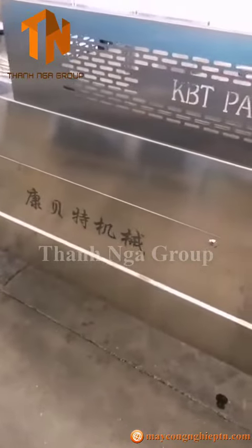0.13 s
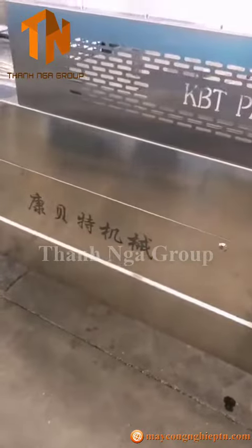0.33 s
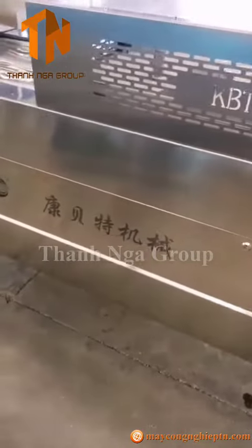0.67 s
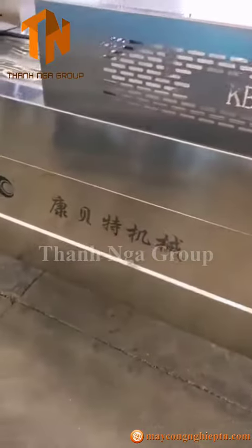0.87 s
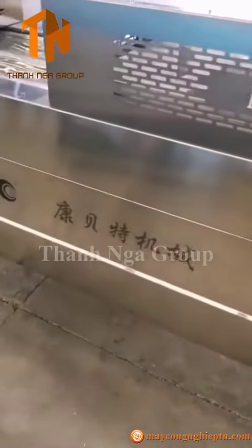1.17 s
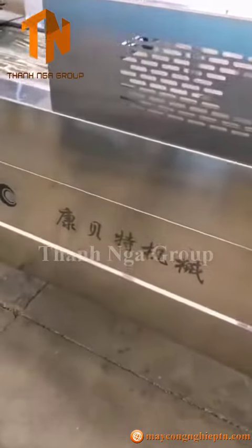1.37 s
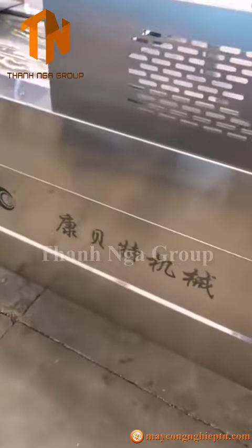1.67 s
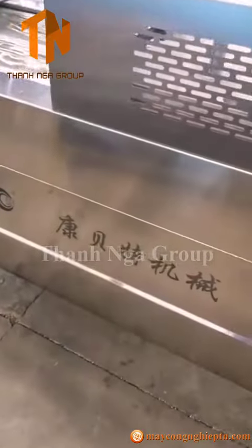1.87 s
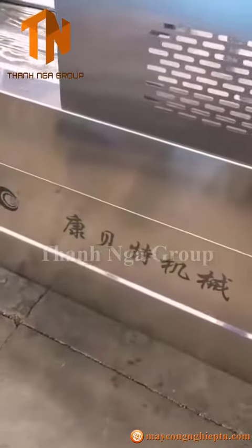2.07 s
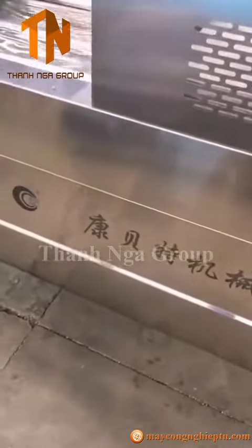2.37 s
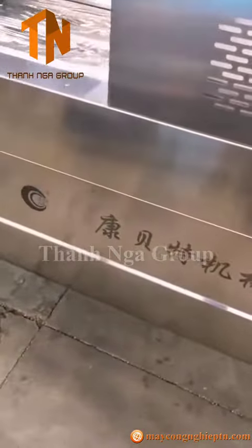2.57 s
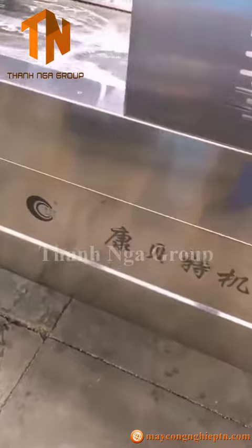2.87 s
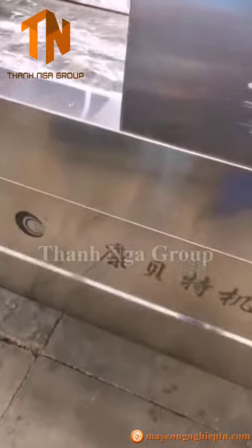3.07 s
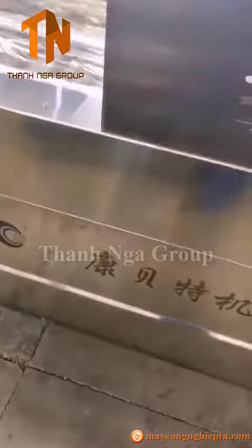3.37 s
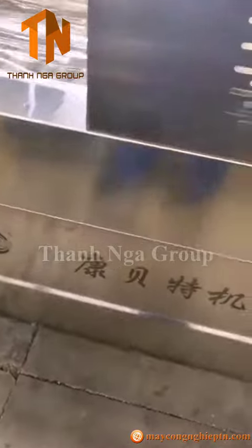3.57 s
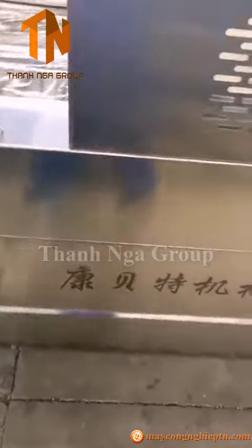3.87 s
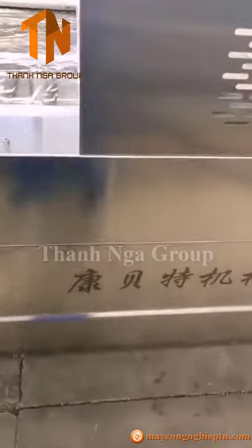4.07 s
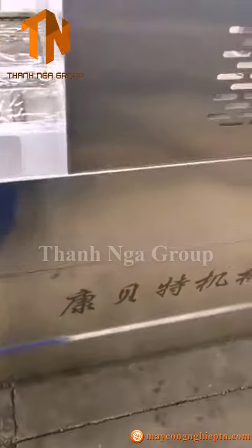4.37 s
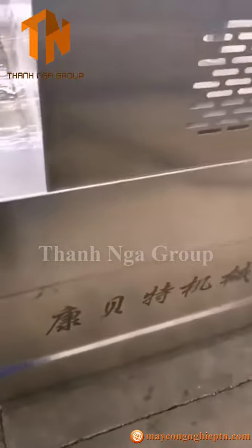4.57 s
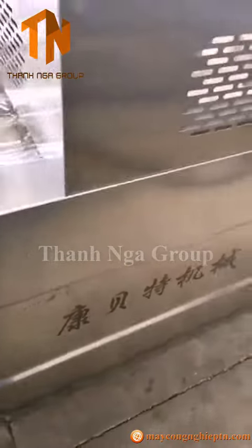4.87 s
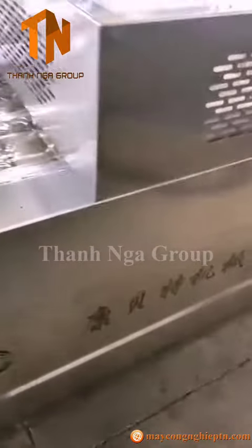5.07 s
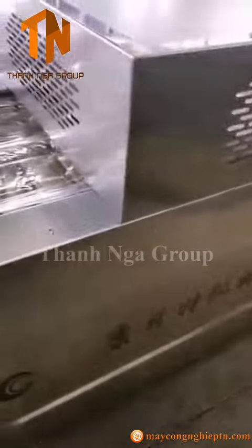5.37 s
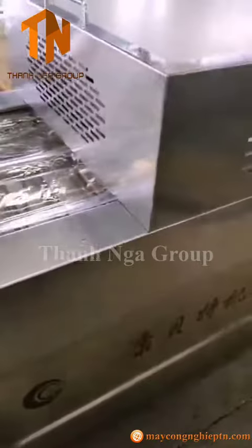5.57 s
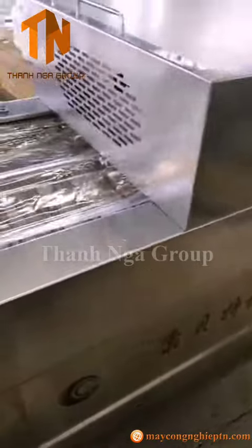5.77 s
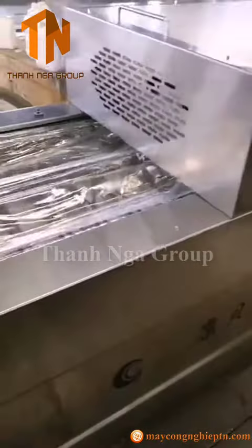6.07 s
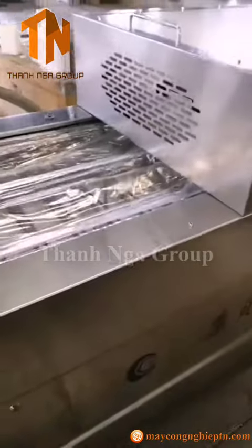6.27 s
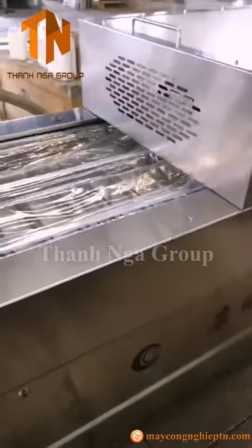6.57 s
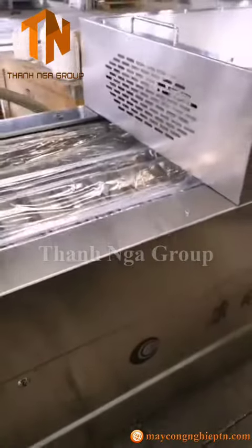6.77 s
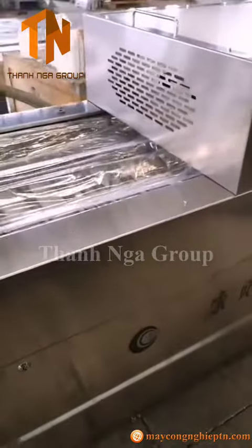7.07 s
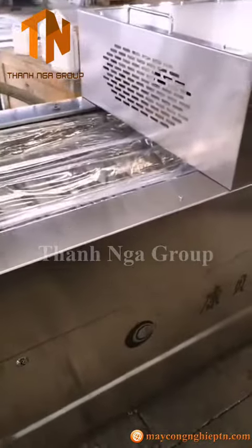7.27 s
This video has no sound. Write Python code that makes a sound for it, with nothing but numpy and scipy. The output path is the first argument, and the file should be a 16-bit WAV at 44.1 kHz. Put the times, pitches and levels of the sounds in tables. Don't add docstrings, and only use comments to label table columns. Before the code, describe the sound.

Close mono pickup beside a steel machine in a hard-surfaced hall: a forceful, bright air release comes first, weakening before it stops with a dull thump. Several seconds of low drive rumble and thin hiss carry small frame knocks, tiny dry roller squeaks and a far air leak. Then a longer, steadier and brighter jet bursts out, ending in chattering puffs, heavy clanks, a faint motor hum and one final puff.

```python
import sys
import numpy as np
from scipy import signal
from scipy.fft import rfft, irfft, next_fast_len
from scipy.io import wavfile
from scipy.ndimage import uniform_filter1d

SR = 44100
rng = np.random.default_rng(int(sys.argv[2]) if len(sys.argv) > 2 else 0)


def to_wav(sig):
    pcm = np.clip(np.atleast_2d(sig), -1, 1) * 32767
    pcm = np.round(pcm).astype(np.int16)
    wavfile.write(sys.argv[1], SR, pcm.T)


def to_linear_factor(level_db):
    exponent = np.asarray(level_db, float) / 20
    return 10 ** exponent


N = 326781

# time_s, level_db
FIRST_VENT = [
    (0.065, -69),
    (0.089, -46),
    (0.103, -21),
    (0.128, -21),
    (0.45, -22),
    (0.81, -24.5),
    (0.95, -28.5),
    (1.03, -31),
    (1.212, -31),
]
# time_s, pitch_hz, level_db
MOTOR = [(6.4, 78, -45.5), (6.5, 81.8, -53), (6.722, 82, -58), (6.792, 69, -41), (6.854, 69, -57),
         (6.934, 73.5, -47), (7.19, 72.7, -61), (7.252, 75.5, -51), (7.41, 74.5, -52)]


def rms_one(x):
    return x / np.sqrt(np.mean(x ** 2) + 1e-20)


def in_time(rows):
    s, *columns = np.transpose(rows)
    return [np.interp(np.arange(N) / SR, s, c) for c in columns]


def sounding(rows, fade_s=0.036):
    start_s, end_s = rows[0][0], rows[-1][0]
    corners_s = [start_s - fade_s, start_s, end_s, end_s + fade_s]
    return np.interp(np.arange(N) / SR, corners_s, [0, 1, 1, 0])


def swells(rows, rise_s, fall_db_per_s):
    t = np.arange(N) / SR
    total = np.zeros(N)
    for start_s, hold_s, level_db in rows:
        rise = np.clip((t - start_s) / max(rise_s, .001), 0, 1) ** 2
        fall_db = fall_db_per_s * np.maximum(t - start_s - hold_s, 0)
        total += rise * to_linear_factor(level_db - fall_db)
    return total


def drift(rate):
    r = np.exp(-80 * np.pi * rate / SR)
    slow = signal.lfilter([1], [1, -2 * r, r * r], rng.standard_normal(N // 40 + 2002))[2000:]
    return np.interp(np.arange(N) / 40, np.arange(len(slow)), rms_one(slow))


def band(x, low_hz, high_hz):
    return signal.sosfilt(signal.butter(2, [low_hz, high_hz], "band", fs=SR, output="sos"), x)


def turbulence(together_db, patchy_db, patch_rate):
    white = rng.standard_normal((2, N))
    gust_db = together_db * drift(19.0)
    edges = 20 * 2 ** np.arange(0, 9.9, 1 / 3)
    total = np.zeros(N)
    for k, (low_hz, high_hz) in enumerate(zip(edges, edges[1:])):
        flicker_db = gust_db + patchy_db * drift(patch_rate)
        total += to_linear_factor(flicker_db) * band(white[k % 2], low_hz, high_hz)
    return total


def colour(x, spectrum, resonances):
    size = next_fast_len(N)
    hz = np.arange(size // 2 + 1) * SR / size + 1e-3
    spectrum_hz, spectrum_db = np.transpose(spectrum)
    gain_db = np.interp(np.log(hz), np.log(spectrum_hz), spectrum_db)
    for centre_hz, width_hz, lift_db in resonances:
        gain_db += lift_db / (1 + (2 * (hz - centre_hz) / width_hz) ** 2)
    return hz, rfft(x, size) * to_linear_factor(gain_db)


def registers(hz, shaped, low_hz, high_hz):
    low = 1 / (1 + (hz / low_hz) ** 6)
    high = 1 / (1 + (high_hz / hz) ** 10)
    parts = (low, 1 - low - high, high)
    return [rms_one(irfft(shaped * part, next_fast_len(N))[:N]) for part in parts]


def tone(hz, gain, waver_db, waver_hz, rate):
    phase = 2 * np.pi * np.cumsum(hz + waver_hz * drift(rate)) / SR
    return np.sqrt(2) * gain * to_linear_factor(waver_db * drift(rate)) * np.sin(phase)


def far_hose():
    # start_s, length_s, level_db
    hose_leaks = [
        (2.62, 0.16, -57),
        (2.9, 0.55, -57.5),
    ]
    return swells(hose_leaks, rise_s=0.075, fall_db_per_s=25)


def machine(first, second):
    # time_s, level_db
    drive_level = [(0.07, -52), (0.16, -46.5), (0.5, -59.5), (1.03, -62), (1.3, -55.5), (1.55, -59.5),
                   (1.81, -54), (2.15, -56), (2.62, -51.5), (2.89, -48.5), (3.32, -47), (3.88, -48.5),
                   (4.15, -49), (4.6, -53), (5.6, -55), (6.3, -51), (6.87, -48), (7.41, -49.5)]
    # frequency_hz, density_db
    machine_spectrum = [(15, -45), (25, -10.5), (293, -1.5), (363, -5.5), (649, -16), (802, -14),
                        (1330, -17), (1600, -15.5), (1970, -18.5), (2940, -16.5), (4480, -21),
                        (5690, -15.5), (6330, -22.5), (14000, -26.5)]
    # centre_hz, width_hz, lift_db
    housing_modes = [(267, 90, -3), (2868, 430, 3), (5480, 1200, -2.5)]
    drive_db = in_time(drive_level)[0]
    swing_db = drive_db + 52
    rumble_gain, rattle_gain = to_linear_factor(-60 + 1.2 * swing_db), to_linear_factor(-51.5 + 0.6 * swing_db)
    hiss_gain, top_gain = to_linear_factor(-45 + 0.36 * swing_db), to_linear_factor(-58 + 0.068 * swing_db)

    pump_idle_db = -5.5
    hiss_gain = hiss_gain * to_linear_factor(pump_idle_db * (np.arange(N) < FIRST_VENT[2][0] * SR))
    motor_rumble_db = 3.5
    rumble_gain = rumble_gain * to_linear_factor(motor_rumble_db * sounding(MOTOR, fade_s=0.23))
    jet_rumble_db, jet_shake_db = -40, -28.5
    rumble_gain = np.hypot(rumble_gain, to_linear_factor(jet_rumble_db) * (first + second))
    rattle_gain = np.hypot(rattle_gain, to_linear_factor(jet_shake_db) * second)
    top_gain = np.hypot(top_gain, far_hose())

    noise = turbulence(together_db=0.5, patchy_db=1.9, patch_rate=14.)
    rumble, drive, upper = registers(*colour(noise, machine_spectrum, housing_modes), 170, 500)
    flat = [(1, 0), (2, 0)]
    rattle, hiss, top = registers(*colour(upper, flat, []), 1400, 8300)
    below = rumble_gain * rumble + to_linear_factor(drive_db) * drive + rattle_gain * rattle
    return below + hiss_gain * hiss + top_gain * top


def flow(rows, close_db_per_s):
    start_s, open_s = rows[0][0], rows[-1][0] - rows[0][0]
    hall_db, hall_fall_db_per_s = -11, 77
    direct = swells([(start_s, open_s, 0)], 0, close_db_per_s)
    hall = swells([(start_s, open_s, hall_db)], 0, hall_fall_db_per_s)
    return to_linear_factor(in_time(rows)[0]) * np.maximum(direct, hall)


def reflected(x):
    # extra_path_m, level_db, change_m_per_s
    echo_paths = [(0.6, -17, 0.07), (1.3, -17, -0.11), (2.7, -19, 0.15), (5.3, -19, -0.2)]
    n = np.arange(N)
    total, power = x.copy(), 1
    for path_m, level_db, speed in echo_paths:
        delay = (path_m + speed * n / SR) * SR / 343  # samples, at 343 m/s
        total += to_linear_factor(level_db) * np.interp(n - delay, n, x, left=0)
        power += to_linear_factor(2 * level_db)
    return total / np.sqrt(power)


def vent(air, gain, spectrum, nozzle, throat_db, top_db):
    throat, body, top = registers(*colour(air, spectrum, nozzle), 1950, 9000)
    throat_lag_s = 0.012
    keep = np.exp(-1 / (throat_lag_s * SR))
    late = signal.lfilter([1 - keep], [1, -keep], gain + 1e-12)
    sharp = gain * np.minimum(gain / to_linear_factor(-42), 1)
    return gain * body + to_linear_factor(throat_db) * late * throat + to_linear_factor(top_db) * sharp * top


def first_jet(eddies, gain):
    # frequency_hz, density_db
    first_spectrum = [(290, -42.5), (500, -32.5), (923, -28.5), (1270, -25.5), (2780, -1), (5740, -4.5),
                      (6780, -7), (7790, 1), (9210, -6), (14000, -1.5)]
    # centre_hz, width_hz, lift_db
    first_modes = [(2720, 190, 1), (5760, 1700, 10), (7950, 1000, 6.)]
    return vent(eddies, gain, first_spectrum, first_modes, throat_db=-13.0, top_db=-3.0)


def struck_frame(table, low, high, push_share):
    out, t = np.zeros(N), np.arange(SR // 2) / SR
    rise = 1 - np.exp(-t / 0.0083)
    for (start_s, peak_db, centre_hz, t60_s), noise in zip(table, rng.standard_normal((len(table), len(t)))):
        edges = centre_hz * low, centre_hz * high
        shake = rms_one(band(band(noise, *edges), *edges))
        push = np.sin(2 * np.pi * centre_hz * t) * to_linear_factor(-60 * t / (t60_s * 0.77))
        blow = rise * (0.57 * shake * to_linear_factor(-60 * t / t60_s) + push_share * push)
        at = round(start_s * SR)
        out[at:at + len(t)] += to_linear_factor(peak_db) * blow[:N - at]
    return out


def lid_blows():
    # start_s, peak_db, centre_hz, t60_s
    scrape_blows = [
        (0.105, -29.5, 808, 0.97),
        (1.604, -41, 975, 0.56),
        (1.648, -45, 960, 0.2),
        (1.699, -36, 950, 0.28),
        (7.251, -23, 964, 0.087),
    ]
    # start_s, peak_db, centre_hz, t60_s
    thump_blows = [(1.202, -27.5, 117.5, 0.27), (1.225, -30, 264.5, 0.27), (1.299, -36.5, 264, 0.18),
                   (1.645, -35, 346, 0.3), (1.699, -36.5, 256, 0.24), (1.769, -42.5, 252, 0.31),
                   (1.869, -43, 245, 0.22), (2.654, -41, 305, 0.52), (2.905, -35, 293, 0.7),
                   (3.029, -31, 256, 0.12), (3.149, -33.5, 247, 0.19), (3.245, -35, 175.6, 0.4),
                   (3.778, -39, 276, 0.31), (4.049, -37, 218, 0.25), (4.399, -31, 338, 0.081),
                   (6.389, -29, 97, 0.14), (6.437, -34, 87, 0.3), (6.643, -36, 100, 0.26),
                   (6.701, -23.5, 201.4, 0.17), (6.739, -26.5, 361, 0.24), (6.786, -29, 138, 0.22),
                   (6.941, -38, 80, 0.16), (7.237, -24.5, 177, 0.18)]
    # start_s, peak_db, centre_hz, t60_s
    clank_blows = [(1.225, -40, 484, 0.22), (1.602, -36, 590, 0.28), (1.69, -35.5, 600, 0.23),
                   (6.71, -21.5, 540, 0.18), (6.741, -29.5, 640, 0.078)]
    scrapes = struck_frame(scrape_blows, .75, 1.7, 0.16)
    thumps = struck_frame(thump_blows, 0.66, 1.5, 0.88)
    return scrapes + thumps + struck_frame(clank_blows, 0.7, 1.4, 0.6)


def squeaks():
    # start_s, length_s, level_db
    low_squeaks = [(2.38, 0.11, -49.5), (2.735, 0.03, -53)]
    # start_s, length_s, level_db
    high_squeaks = [(2.4, 0.02, -57), (2.62, 0.055, -52), (2.715, 0.075, -51), (2.8, 0.06, -58),
                    (2.925, 0.04, -55), (2.985, 0.03, -57), (3.08, 0.05, -56)]
    low, high = (swells(rows, rise_s=0.025, fall_db_per_s=400) for rows in (low_squeaks, high_squeaks))
    return tone(2358, low, 0.6, 3.0, 25.0) + tone(5845, high, 1.3, 22., 30.)


def second_flow():
    # time_s, level_db
    second_opening = [(4.392, -67), (4.408, -21), (4.434, -21.5), (4.49, -20), (4.606, -22.5), (4.908, -21),
                      (5.03, -22), (5.95, -23), (6.3, -23.5)]
    # start_s, open_s, level_db
    valve_chatter = [
        (6.378, 0.19, -30),
        (6.58, 0.066, -36),
        (6.63, 0.064, -29.5),
        (6.69, 0.066, -33),
        (6.755, 0.042, -42.5),
        (6.81, 0.071, -51),
        (7.188, 0.063, -29.5),
        (7.27, 0.036, -43),
    ]
    puffs = swells(valve_chatter, rise_s=0.032, fall_db_per_s=444)
    return flow(second_opening, close_db_per_s=114) + puffs


def second_jet(eddies, gain):
    # frequency_hz, density_db
    second_spectrum = [(530, -50), (900, -24.5), (1750, -6.5), (2180, -6.5), (2970, -2), (4650, -4),
                       (5850, -3), (6710, -5), (9370, -2), (14000, 3)]
    # centre_hz, width_hz, lift_db
    second_modes = [(1790, 300, 3.), (2970, 400, 3.), (3780, 150, 3.), (5780, 700, 5.), (7640, 500, 4.),
                    (9580, 380, 4.), (12300, 500, 2.)]
    return vent(eddies, gain, second_spectrum, second_modes, throat_db=-17.0, top_db=-5.5)


def whistle():
    # start_s, length_s, level_db
    edge_tone_locks = [(4.43, 0.065, -30.5), (4.6, 0.44, -32.5), (4.96, 0.096, -29), (5.125, 0.058, -26.5),
                       (5.63, 0.044, -42), (5.95, 0.15, -50), (6.27, 0.04, -36), (6.39, 0.12, -34)]
    centre_hz, width_hz = 5810, 260
    noise = band(rng.standard_normal(N), centre_hz - width_hz / 2, centre_hz + width_hz / 2)
    return swells(edge_tone_locks, rise_s=0.026, fall_db_per_s=137) * rms_one(noise)


def motor():
    hz, level_db = in_time(MOTOR)
    return tone(hz, sounding(MOTOR) * to_linear_factor(level_db), 3.0, 2.8, 5.9)


def scene():
    eddies = reflected(turbulence(together_db=.45, patchy_db=1.6, patch_rate=17.))
    first = flow(FIRST_VENT, close_db_per_s=300)
    second = second_flow()
    air = first_jet(eddies, first) + second_jet(eddies, second) + whistle()
    mono = machine(first, second) + air + lid_blows() + squeaks() + motor()
    return np.array([mono, mono])


def coarse_lines(x, scatter_db, size=1024, count=90):
    # frequency_hz, quiet_db, loud_db
    step_sizes = [(300, -12, -12), (1400, 1, 1), (2100, 3.5, 7), (3200, 3.5, 7), (4400, 4, 6),
                  (5500, 3.5, 3.5), (8200, 5, 3), (9000, 9.3, 3.5), (10200, 9.8, 6.5), (13300, 9.8, 6.5),
                  (14000, 11.5, 10)]
    n, k = np.arange(2 * size)[:, None] + .5, np.arange(size) + .5
    window = np.sin(np.pi * n / (2 * size))
    basis = np.sqrt(2 / size) * window * np.cos(np.pi / size * (n + size / 2) * k)
    halves = np.pad(x, (size, 2 * size - len(x) % size)).reshape(-1, size)
    lines = np.hstack([halves[:-1], halves[1:]]) @ basis
    step_hz, *step_db = np.transpose(step_sizes)
    quiet_db, loud_db = (np.interp(k * SR / (2 * size), step_hz, c) for c in step_db)
    nearby = np.sqrt(np.abs(uniform_filter1d(lines ** 2, size=48, axis=1)) + 1e-18)
    bands = (count * (k / size) ** .62).astype(int)
    luck = uniform_filter1d(rng.standard_normal((len(lines), count)), size=2, axis=0) * np.sqrt(2)
    luck += .65 * rng.standard_normal((len(lines), 1))
    halves_db = 10 * np.log10(np.mean(halves ** 2, axis=1, keepdims=True) + 1e-12)
    load = np.clip((halves_db[1:] + 40) / 12, 0, 1)
    attack_db = -15 * (np.diff(halves_db, axis=0) > 7)
    base_db = quiet_db + load * (loud_db - quiet_db)
    step = nearby * to_linear_factor(base_db + attack_db + scatter_db * luck[:, bands])
    rounded = step * np.sign(lines) * np.floor(np.abs(lines) / step + .4)
    frames = (rounded + .06 * (lines - rounded)) @ basis.T
    return (frames[1:, :size] + frames[:-1, size:]).ravel()[:len(x)]


def band_limit(x):
    return signal.sosfilt(signal.butter(12, 14510, fs=SR, output="sos"), x)


def record(dry):
    coarse = coarse_lines(dry[0], scatter_db=1.5)
    low_pass = signal.ellip(14, .5, 80, 14020, fs=SR, output="sos")
    mono = signal.sosfilt(low_pass, coarse)
    return band_limit(np.array([mono, mono]))


dry = scene()
out = record(dry)
to_wav(out)
```